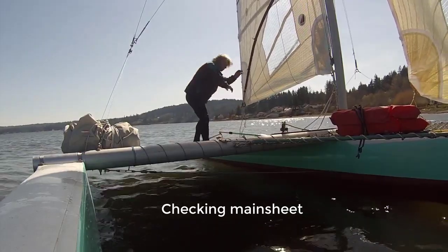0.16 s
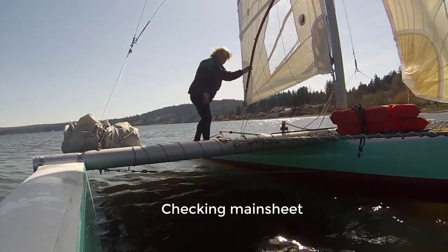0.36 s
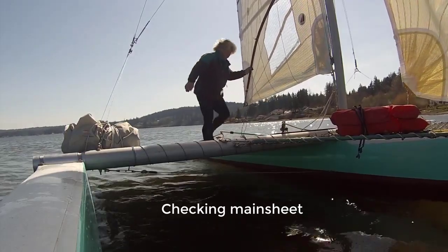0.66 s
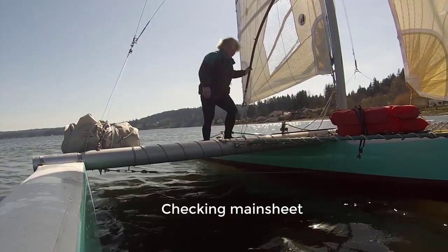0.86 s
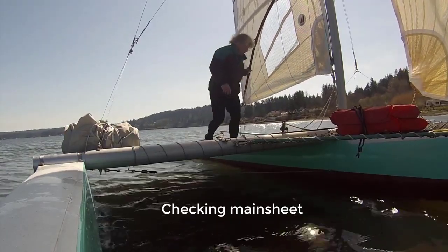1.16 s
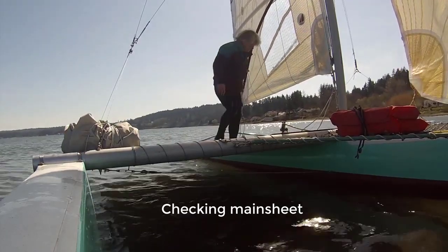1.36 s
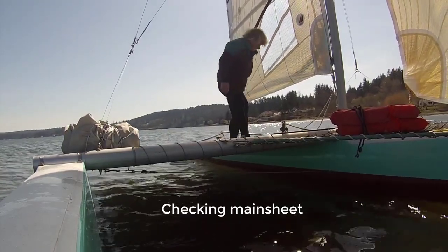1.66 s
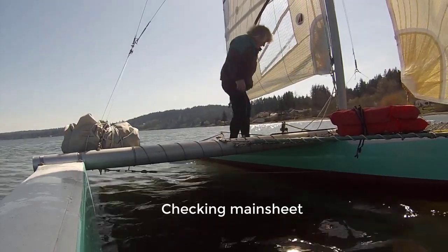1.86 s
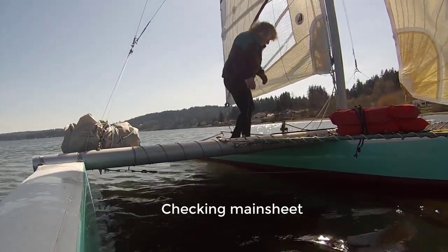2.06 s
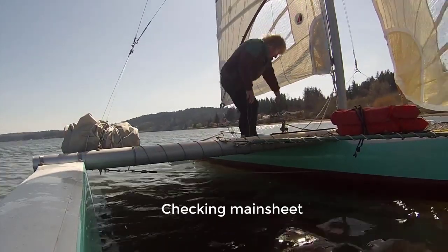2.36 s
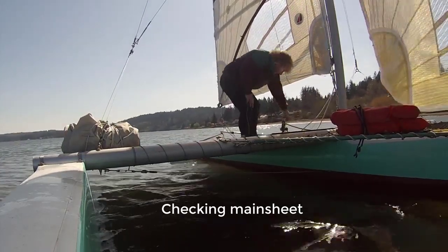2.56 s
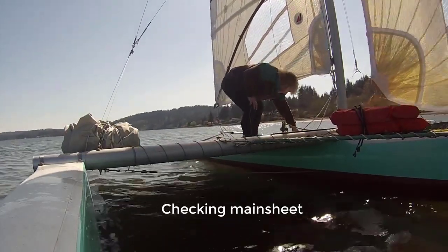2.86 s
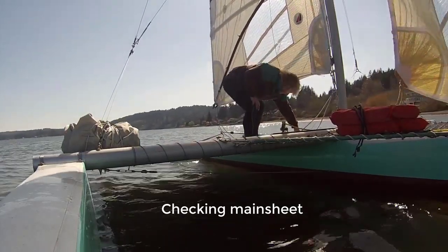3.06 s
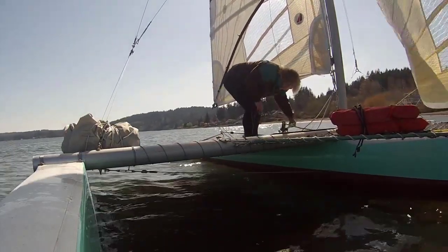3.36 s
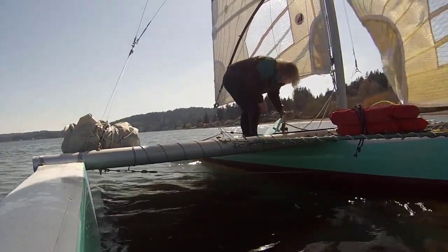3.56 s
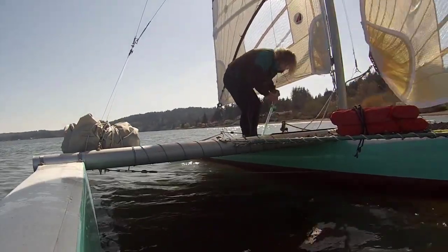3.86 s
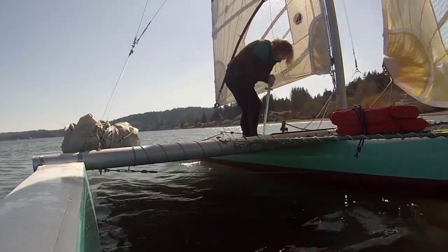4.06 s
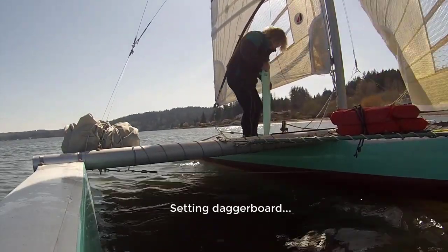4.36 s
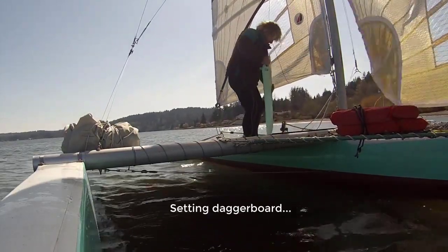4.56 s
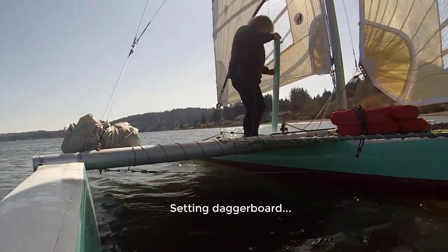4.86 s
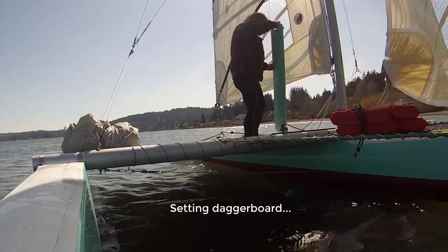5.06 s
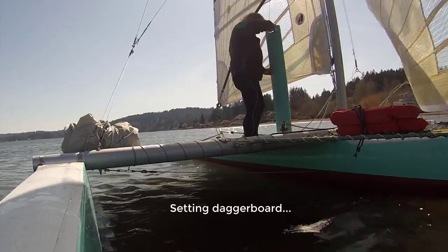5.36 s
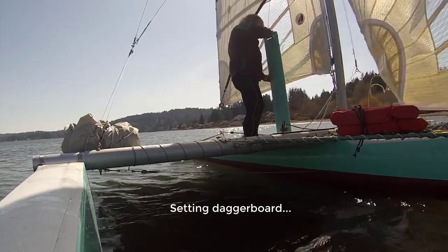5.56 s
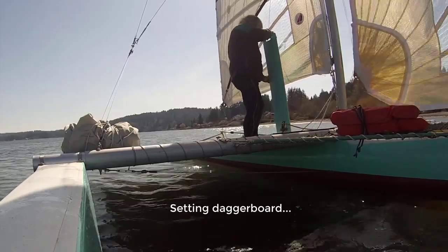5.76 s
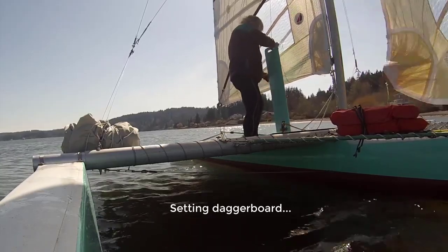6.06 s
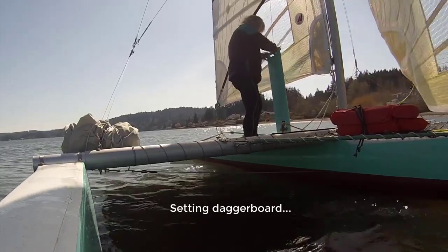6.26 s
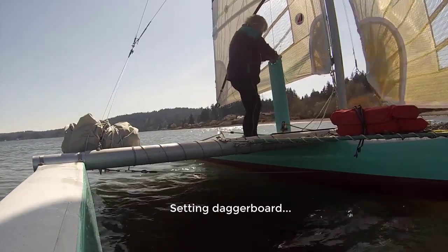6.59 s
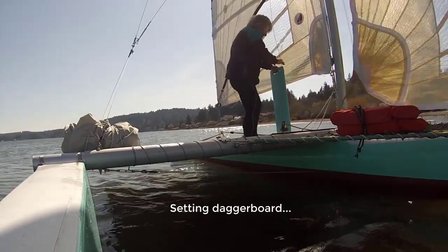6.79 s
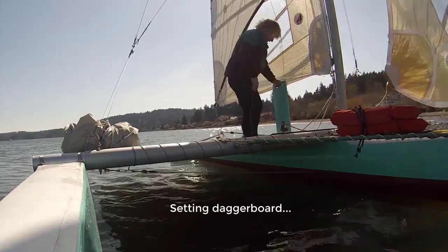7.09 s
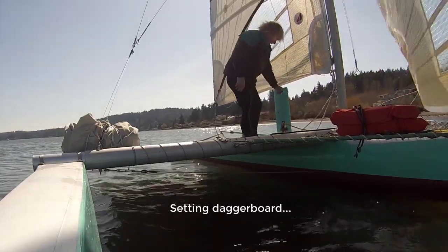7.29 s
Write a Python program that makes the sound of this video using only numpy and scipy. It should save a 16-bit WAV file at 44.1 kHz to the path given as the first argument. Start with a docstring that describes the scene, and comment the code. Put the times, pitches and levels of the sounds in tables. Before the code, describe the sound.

Wavelets lap and slap against a hollow boat hull, with low booms, a heavy thump around three seconds, watery plops and faint hiss.

```python
"""At the waterline of a small sailing boat, wavelets lap and slap the hulls, heard from a point on one hull.
The hollow hull booms in a few low modes driven by noise, and its mount sways in one very low mode.
Lapping and slaps are noise bursts ringing through the brighter shell modes; plops are short decaying sines.
Thumps are sums of damped sines, tolls are tones of sinking pitch, and ticks are brief bright noise.
A soft, steady hiss of shaped noise lies beneath."""
import sys
import numpy as np
from scipy import signal
from scipy.fft import rfft, irfft, next_fast_len
from scipy.io import wavfile
from scipy.ndimage import uniform_filter1d

SR = 44100
rng = np.random.default_rng(int(sys.argv[2]) if len(sys.argv) > 2 else 0)


def digitize_waveform(pressure):
    """Quantize a signal to 16-bit integers and store it at the path in sys.argv[1].

    Rows of a 2-D input are taken as channels; values are limited to [-1, 1].
    """
    field = np.atleast_2d(pressure).T
    bounded = np.clip(field, -1, 1)
    quanta = np.round(bounded * 32767).astype(np.int16)
    wavfile.write(sys.argv[1], SR, quanta)


N = 327562


def gain_of(db):
    """Definition of level: amplitude ratio = 10^(dB / 20)."""
    return 10 ** (np.asarray(db) / 20)


def evened(x):
    """Normalization: scales a signal to an rms of 1."""
    return x / np.sqrt(np.mean(x ** 2) + 1e-20)


def curves(rows):
    """Linear interpolation: turns each column after the time into a curve, sample by sample."""
    time, *columns = np.transpose(rows)
    return [np.interp(np.arange(N) / SR, time, column) for column in columns]


def mode_shapes(modes, size, passes=1):
    """Resonance: one response per mode; their sum passes white noise at unchanged rms."""
    hz = np.fft.rfftfreq(size, 1 / SR) + 1e-3  # the offset avoids division by zero
    shapes = []
    for k, (centre, width, db) in enumerate(modes):
        detuning = (hz - centre * centre / hz) / width
        sign = (-1) ** k  # neighbouring modes have opposite polarity
        shapes.append(sign * gain_of(db) / (1 + 1j * detuning) ** passes)
    shapes = np.array(shapes)
    return shapes / np.sqrt(np.mean(abs(shapes.sum(0)) ** 2))


def ring(x, modes, passes=1):
    """Modal superposition: passes x, or one row of x for each mode, through the modes and adds them."""
    length = x.shape[-1]
    size = next_fast_len(length + SR // 4)
    spectrum = (rfft(x, size) * mode_shapes(modes, size, passes)).sum(0)
    return irfft(spectrum, size)[:length]


def steadied(x, seconds, share):
    """Envelope compression: evens out part of the chance swells that last longer than the given time."""
    size = max(round(seconds * SR), 1)
    power = uniform_filter1d(uniform_filter1d(x ** 2, size), size)
    return evened(x / (abs(power) + 1e-9) ** (share / 2))


def humming(modes, passes, seconds, share):
    """Random excitation: noise keeps the modes sounding, with part of their slow swells evened out."""
    noise = rng.standard_normal(N + SR)
    return steadied(ring(noise, modes, passes), seconds, share)[SR:]  # the build-up is dropped


def damped(x, hz):
    """Low-pass transmission: second order, little passes above hz."""
    return signal.sosfilt(signal.butter(2, hz, fs=SR, output="sos"), x)


def wavelets(per_s, spread_db, rise, t60, count):
    """Shot noise: envelopes of rms 1 made of short puffs at random moments, a few of them large."""
    sizes = gain_of(spread_db * np.minimum(rng.exponential(1, (count, N)), 4))
    struck = rng.random((count, N)) < per_s / SR
    t = np.arange(3000) / SR
    puff = gain_of(-60 * t / t60) * (1 - np.exp(-t / rise))
    return evened(signal.oaconvolve(sizes * struck, puff[None], axes=1)[:, :N])


# restless water under the hull: (time [s], level of low modes [dB], level of upper modes [dB])
RESTLESS_WATER = [(0.0, -27.5, -27.5), (0.18, -39, -48.5), (0.41, -31.5, -49), (0.58, -38, -41.5),
                  (1.0, -41.5, -51.5), (1.7, -53, -60), (2.25, -44.5, -45.5), (2.8, -48.5, -51),
                  (3.1, -41.5, -44.5), (3.6, -32.5, -43.5), (4.15, -45.5, -43.5), (4.7, -40.5, -42.5),
                  (5.3, -50, -47.5), (5.6, -35.5, -45.5), (6.1, -43, -44.5), (6.75, -43, -49.5),
                  (7.14, -48, -38.5), (7.43, -40.5, -44.5)]
# waves that heave the hull: (start [s], hold after the rise [s], low modes [dB], upper modes [dB])
HEAVING_WAVES = [(0.16, 0.081, -32.5, -46), (0.27, 0.11, -27, -33.5), (1.064, 0.036, -28.5, -43.5),
                 (1.76, 0.035, -40.5, -60), (2.7, 0.012, -39, -70), (3.34, 0.13, -35, -37),
                 (4.23, 0.032, -37, -46), (4.45, 0.024, -30.5, -58), (4.86, 0.006, -31.5, -36),
                 (5.025, 0.013, -36.5, -46), (5.4, 0.12, -32.5, -43.5), (5.68, 0.013, -30, -48),
                 (6.43, 0.026, -39.5, -60), (6.835, 0.048, -39.5, -38), (7.05, 0.043, -37, -42),
                 (7.2, 0.021, -28.5, -57)]
BOOM_RISE_S, BOOM_FALL_DB_PER_S = 0.018, 190


def heave():
    """Addition of powers: the restless water plus each boom, which rises, holds and dies."""
    power = gain_of(curves(RESTLESS_WATER)) ** 2
    for start, held, *db in HEAVING_WAVES:
        t = np.arange(N) / SR - start
        rise = np.sin(np.pi / 2 * np.clip(t / BOOM_RISE_S, 0, 1)) ** 2
        fall = gain_of(-BOOM_FALL_DB_PER_S * np.maximum(t - BOOM_RISE_S - held, 0))
        power = power + (gain_of(db)[:, None] * rise * fall) ** 2
    return np.sqrt(power)


# low and upper modes of the hollow hull:
# (centre frequency [Hz], width for a single pass [Hz], relative level for a single pass [dB])
LOW_MODES = [(62.3, 5, -7.5), (76, 5, -4.5), (81.85, 5.6, -2.5), (91.5, 5.26, 2)]
UPPER_MODES = [(165.1, 8.25, 2), (183.4, 39.7, -8), (222.9, 17.2, -6), (242.7, 9.3, -1)]


def hull():
    """Forced resonance: restless water keeps the modes of the hollow hull sounding."""
    low_level, upper_level = heave()
    low = low_level * humming(LOW_MODES, 1.075, 0.16, 0.94)
    upper = upper_level * humming(UPPER_MODES, 1.12, 0.38, 0.16)
    return low + upper


# sway of the mount: (time [s], level [dB])
SWAY_LEVEL = [(0.0, -43), (0.25, -34), (0.5, -29.5), (1.14, -33), (1.55, -28), (2.54, -44), (2.96, -38),
              (4.57, -49.5), (5.36, -37), (5.92, -43), (6.7, -36.5), (7.22, -35), (7.43, -25.5)]
SWAY_HZ, SWAY_WIDTH_HZ = 20.74, 5.84  # the width is that of a single pass


def mount():
    """Narrow-band resonance: one very low mode that wanders slowly in strength."""
    sway = humming([(SWAY_HZ, SWAY_WIDTH_HZ, 0)], 3.65, 0.49, 0.71)
    sway = damped(damped(sway, SWAY_HZ), SWAY_HZ)
    return gain_of(curves(SWAY_LEVEL)[0]) * evened(sway)


# lapping along the waterline: (time [s], level [dB])
LAP_LEVEL = [(0.0, -55), (0.31, -82), (1.41, -81), (1.88, -63.5), (2.15, -52), (2.52, -56), (3.3, -59.5),
             (3.41, -49), (3.58, -53.5), (4.2, -59), (4.85, -49.5), (5.07, -60.5), (5.7, -61),
             (6.21, -56.5), (6.7, -58.5), (7.01, -54.5), (7.43, -57)]
# modes of the shell and its bright modes, rung by laps and slaps:
# (centre frequency [Hz], width for a single pass [Hz], relative level for a single pass [dB])
SHELL_MODES = [(396, 41, -3.5), (536, 46, -2.5), (764, 119, -5.5), (940, 110, -6.5), (1364, 134, -1),
               (1514, 50, -5.5), (1657, 88, -4), (1854, 102, -5), (1995, 180, -8), (2382, 390, -10)]
BRIGHT_MODES = [(2836, 290, -5.5), (3590, 200, -4.5), (3917, 72, -5), (4430, 640, -14.5), (5310, 590, -10),
                (7800, 660, -18.5)]
LAP_TREBLE_DB = -12.5  # bright modes relative to the shell modes


def lapping():
    """Modulated noise: wavelets wash the shell, droplets tick in the treble, plips each wake one mode."""
    level_db = curves(LAP_LEVEL)[0]
    wash = wavelets(220, 1.5, .003, .05, count=1)
    droplets = wavelets(45, 3, .0006, .025, count=1)
    shell_beat = 0.14 + wash
    bright_beat = 0.18 + 0.44 * wash + droplets
    out = np.zeros(N)
    for modes, db, beat in ((SHELL_MODES, level_db, shell_beat),
                            (BRIGHT_MODES, level_db + LAP_TREBLE_DB, bright_beat)):
        plips = wavelets(150, 2, .002, .025, count=len(modes))
        envelopes = evened(beat * (1.9 + plips))
        out += ring(gain_of(db) * envelopes * rng.standard_normal(N), modes)
    return out


# steady hiss of air and far water: (frequency [Hz], relative spectral density [dB per Hz])
HISS_SPECTRUM = [(15, 9), (35, 12), (60, 8.5), (130, 5), (280, 1.5), (700, -5.5), (1500, -9.5),
                 (3000, -16.5), (6000, -21), (11000, -27.5), (15000, -35.5)]
HISS_DB = -56.5  # rms before the band limit


def hiss():
    """Spectral shaping: steady noise weighted along a smooth curve over log frequency."""
    f, db = np.transpose(HISS_SPECTRUM)
    hz = np.fft.rfftfreq(N, 1 / SR)
    shape = gain_of(np.interp(np.log(hz + 1), np.log(f + 1), db)) * (hz > f[0])
    return gain_of(HISS_DB) * evened(irfft(rfft(rng.standard_normal(N)) * shape, N))


# hollow plops and droplets: (time [s], strength before the rise and flutter [dB], pitch [Hz])
PLOP_EVENTS = [(0.282, -45, 1780), (.836, -52, 3930), (1.084, -44, 1800), (2.489, -41, 508),
               (3.405, -37, 713), (3.4067, -30, 1420), (3.487, -43.5, 3800), (3.509, -32, 1727),
               (3.927, -43, 2900), (4.447, -42, 2920), (5.387, -36, 1395), (5.42, -45.5, 3830),
               (5.76, -46, 1370), (6.098, -42, 1390), (6.313, -44.5, 4650), (6.397, -40.5, 2950),
               (6.954, -40, 1360), (6.993, -37, 1400), (7.052, -42, 1800), (7.083, -42, 1800)]
PLOP_RISE_S, PLOP_T60_S, PLOP_ROUGH = .0015, .05, .4


def plops():
    """Free decay of a single resonance: each is one short ring that flutters a little."""
    out, t = np.zeros(N), np.arange(4000) / SR
    draws = rng.standard_normal((len(PLOP_EVENTS), len(t)))
    for (s, strength_db, hz), chance in zip(PLOP_EVENTS, draws):
        flutter = 1 + PLOP_ROUGH * evened(uniform_filter1d(chance, size=100))
        envelope = gain_of(strength_db - 60 * t / PLOP_T60_S) * (1 - np.exp(-t / PLOP_RISE_S))
        out[round(s * SR):][:len(t)] += envelope * flutter * np.sin(2 * np.pi * hz * t)
    return out


# crisp ticks that arrive through the air: (time [s], strength before the rise and band-pass [dB])
TICK_EVENTS = [(0.288, -53.5), (2.001, -53.5)]


def ticks():
    """Band-limited impulse noise: 34 ms of bright noise with a very fast onset, 3.5 to 7 kHz."""
    out, t = np.zeros(N), np.arange(1500) / SR
    draws = rng.standard_normal((len(TICK_EVENTS), len(t)))
    for (s, strength_db), spray in zip(TICK_EVENTS, draws):
        envelope = gain_of(strength_db - 60 * t / 0.3) * (1 - np.exp(-t / 0.00021))
        out[round(s * SR):][:len(t)] = envelope * spray
    return signal.sosfilt(signal.butter(2, [3500, 7000], "bandpass", fs=SR, output="sos"), out)


# slaps on the shell: (time, 1 ms after the onset [s], peak of the shell part before the low-pass [dB],
# treble peak relative to it [dB], t60 of the spray [s], frequency the struck spot favours [Hz])
SLAP_EVENTS = [(0.2918, -37, -24, 0.14, 1360), (0.627, -31.5, -60, 0.11, 1540),
               (0.833, -43.5, -9.5, 0.32, 1790), (1.0974, -38.5, -31, 0.14, 1310),
               (1.5302, -47.5, -8, 0.05, 1170), (2.0039, -32.5, -19, 0.061, 1370),
               (2.07, -39.5, -9.5, 0.084, 1500), (2.1195, -36, -12, 0.46, 1370),
               (2.188, -35.5, -10.5, 0.42, 1420), (2.381, -36, 1.5, 0.064, 2340),
               (2.493, -38.5, -11, 0.047, 1510), (2.71, -42, -10, 0.31, 1360),
               (3.403, -30.5, -16, 0.2, 1410), (3.456, -41.5, -8.5, 0.15, 1730),
               (3.4856, -39, -6, 0.091, 1630), (3.5449, -44, 1.5, 0.2, 1780),
               (3.6591, -37.5, -8, 0.024, 1870), (3.7982, -37, -10, 0.52, 1640),
               (3.83, -32.5, -9.5, 1, 1550), (3.925, -33.5, -22, 0.079, 1860),
               (3.944, -31.5, -43, 0.059, 1480), (4.2, -39, -5, 0.28, 1710),
               (4.4234, -35.5, -9.5, 0.24, 1730), (4.4506, -30, -34, 0.063, 1410),
               (4.463, -32.5, -14, 0.13, 1740), (4.5393, -38, -7.5, 0.26, 1660),
               (4.6123, -39.5, -3, 0.069, 1660), (4.798, -34.5, -9, 0.18, 1520),
               (4.898, -34.5, -11, 0.11, 1720), (4.966, -40.5, -4.5, 0.47, 2310),
               (5.018, -41.5, -6.5, 0.27, 1670), (5.403, -33.5, -14, 0.34, 1440),
               (5.4224, -27, -28, 0.031, 1440), (5.7025, -40, -11, 0.066, 1400),
               (5.846, -41, -24, 0.31, 1380), (5.977, -46, -10, 0.33, 1350), (6.028, -40.5, -5, 0.1, 1750),
               (6.068, -41, -15, 0.044, 1850), (6.17, -38, -15, 0.069, 1810),
               (6.316, -36.5, -7, 0.25, 1650), (6.3973, -30, -17, 0.12, 1380),
               (7.028, -36.5, -11, 0.041, 1810), (7.197, -40, -14, 0.28, 1310)]
# how the struck spot picks its modes: chance, slope, and the most lost above and below its frequency
SPOT_SPREAD_DB, SPOT_DB_PER_OCTAVE, FAR_ABOVE_DB, FAR_BELOW_DB = 3.5, -10.5, -0.5, -6.5
BROAD_HZ, BROAD_FOLLOWS_TREBLE = 150, .4  # wider modes take on this share of the treble's dB
KNOCK, KNOCK_S = 11.8, 0.00042  # initial height over the spray, time constant
SLAP_RISE_S, TREBLE_T60_S = 0.0019, 0.98  # the treble decay comes on top of the spray's own
CLUMP_DB, CLUMP_S = 3.5, .002  # the spray of a slap lands in clumps


def slaps():
    """Impact excitation: a knock and a dying spray of noise; each spot wakes its own mix of modes."""
    out, t = np.zeros(N + SR), np.arange(SR // 3) / SR
    shell_hz, width_hz, _ = np.transpose(SHELL_MODES)
    shell_count = len(SHELL_MODES)
    draws = rng.standard_normal((len(SLAP_EVENTS), 2 * len(t) + shell_count + len(BRIGHT_MODES)))
    knock = KNOCK * np.exp(-t / KNOCK_S)
    rise = 1 - np.exp(-t / SLAP_RISE_S)
    for (s, peak_db, treble_db, t60, spot_hz), draw in zip(SLAP_EVENTS, draws):
        spray, clumps, mix = np.split(draw, [len(t), 2 * len(t)])
        clumps = evened(uniform_filter1d(clumps, max(round(CLUMP_S * SR), 1)))
        decay = gain_of(CLUMP_DB * clumps) * gain_of(-60 * t / max(t60, .01))
        burst = rise * (knock + decay) * steadied(spray, .0005, 0.42)

        mix_db = SPOT_SPREAD_DB * mix
        slope_db = SPOT_DB_PER_OCTAVE * abs(np.log2(shell_hz / spot_hz))
        floor_db = np.where(shell_hz > spot_hz, FAR_ABOVE_DB, FAR_BELOW_DB)
        near_db = np.maximum(slope_db, floor_db)
        near_db = near_db + BROAD_FOLLOWS_TREBLE * treble_db * (width_hz > BROAD_HZ)

        body_gains = gain_of(near_db + mix_db[:shell_count])[:, None]
        body = ring(body_gains * burst, SHELL_MODES, 1.18)
        treble_gains = gain_of(mix_db[shell_count:])[:, None]
        treble = ring(treble_gains * burst * gain_of(-60 * t / TREBLE_T60_S), BRIGHT_MODES)
        slap = body / abs(body).max() + gain_of(treble_db) * treble / abs(treble).max()
        at = round((s - .001) * SR)
        out[at:at + len(t)] += gain_of(peak_db) * slap
    return out[:N]


# heavy thumps under the hull: (time [s], strength of the push [dB])
THUMP_EVENTS = [(.293, -43), (0.63, -24), (2.482, -34), (3.299, -14)]
# what a thump rings with: (frequency [Hz], level before the rise [dB], t60 [s])
THUMP_RINGS = [(152.8, -1.5, 0.14), (240, -5.5, 0.12), (530, -27.5, 0.09)]
THUMP_RISE_S = 0.007


def thumps():
    """Impulse response: a sudden push under the hull sets a few heavily damped modes ringing."""
    push, t = np.zeros(N), np.arange(SR // 5) / SR
    for s, strength_db in THUMP_EVENTS:
        push[round(s * SR)] = gain_of(strength_db)
    modes = sum(gain_of(db - 60 * t / t60) * np.sin(2 * np.pi * hz * t) for hz, db, t60 in THUMP_RINGS)
    rise = 1 - np.exp(-(t / THUMP_RISE_S) ** 2)
    return signal.oaconvolve(push, rise * modes)[:N]


# the heaviest waves leave the main low mode ringing clear:
# (start [s], length [s], starting pitch [Hz], level before the arch and low-pass [dB])
TOLL_EVENTS = [(0.666, 0.056, 94, -29), (2.532, 0.043, 86, -28), (2.572, 0.077, 93, -32.5),
               (3.328, 0.085, 100, -17), (3.434, 0.097, 92.3, -18), (3.531, .062, 91.4, -26),
               (6.889, 0.067, 93, -31.5), (7.164, 0.067, 100, -27)]
TOLL_SAG_HZ_PER_S, TOLL_FLATNESS = 105, 0.31  # a smaller exponent makes a flatter arch


def tolls():
    """Frequency glide: a clear tone that swells, sinks a little in pitch and is choked by the water."""
    out = np.zeros(N)
    for (start, length, hz, db), turn in zip(TOLL_EVENTS, rng.random(len(TOLL_EVENTS))):
        t = np.arange(0, length, 1 / SR)
        arch = abs(np.sin(np.pi * t / length)) ** TOLL_FLATNESS
        cycles = turn + hz * t - TOLL_SAG_HZ_PER_S * t * t / 2
        tone = np.sqrt(2) * gain_of(db) * arch * np.sin(2 * np.pi * cycles)
        out[round(start * SR):][:len(t)] += tone
    return damped(out, 180)


def scene():
    """Superposition: all but the ticks and the hiss arrives through one hull."""
    high_pass = signal.butter(2, 45, "highpass", fs=SR, output="sos")
    booming = signal.sosfilt(high_pass, damped(hull(), 450))
    splashing = damped(lapping() + slaps() + plops(), 5140)
    boat = booming + mount() + tolls() + thumps() + splashing
    fade_in = np.minimum(np.arange(N) / (.01 * SR), 1)  # over 10 ms
    return (fade_in * boat + ticks() + hiss())[None]


EDGE_HZ = 15030


def record(dry):
    """Band limitation: a linear-phase low-pass removes what lies above the edge."""
    band = signal.firwin(511, EDGE_HZ, window=("kaiser", 9), fs=SR)
    return signal.oaconvolve(dry, band[None], "same")


dry = scene()
out = record(dry)
digitize_waveform(out)
```